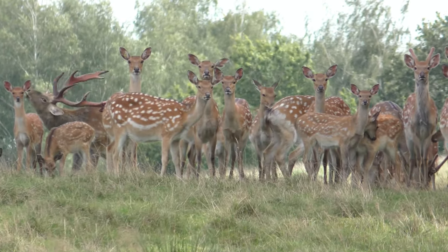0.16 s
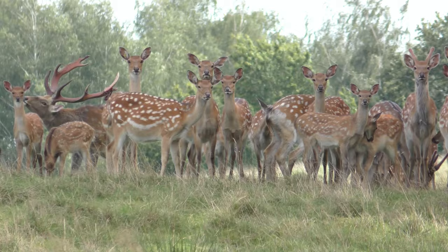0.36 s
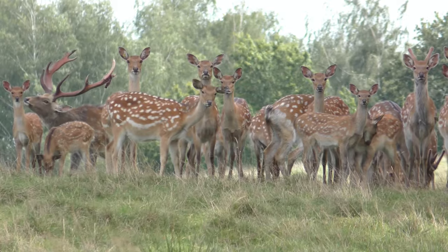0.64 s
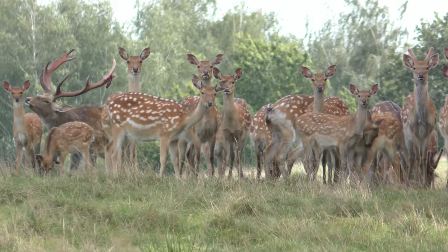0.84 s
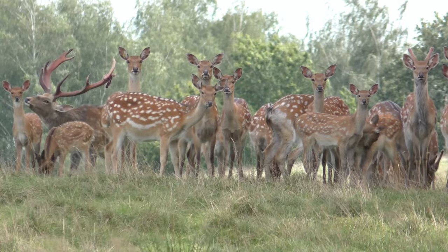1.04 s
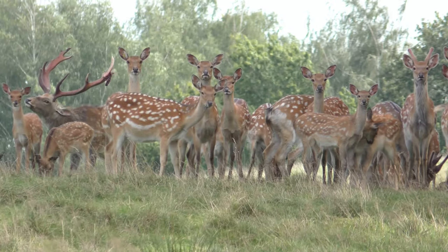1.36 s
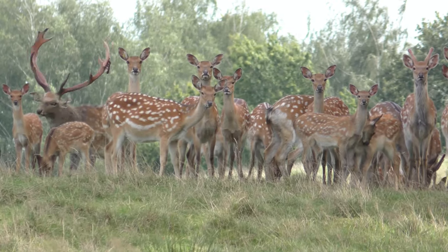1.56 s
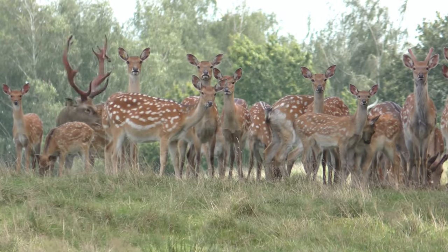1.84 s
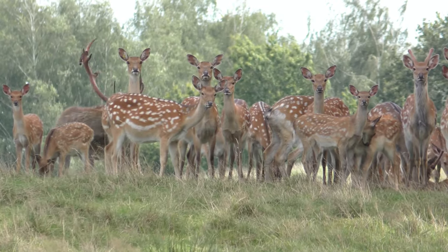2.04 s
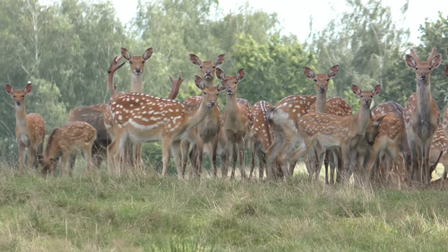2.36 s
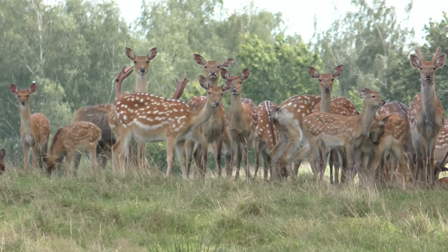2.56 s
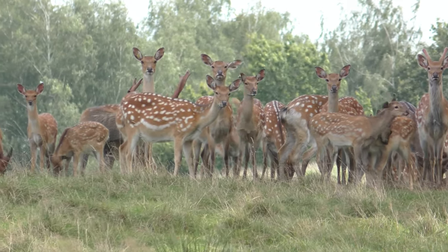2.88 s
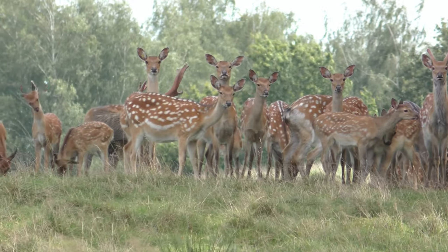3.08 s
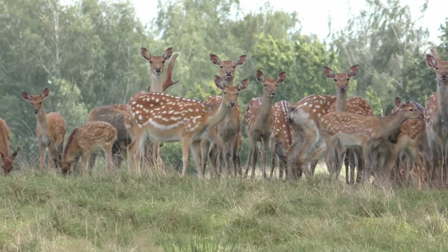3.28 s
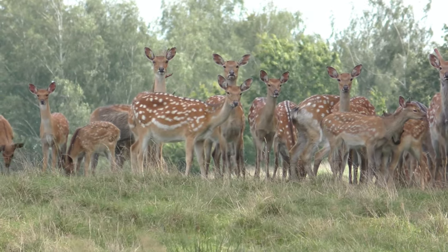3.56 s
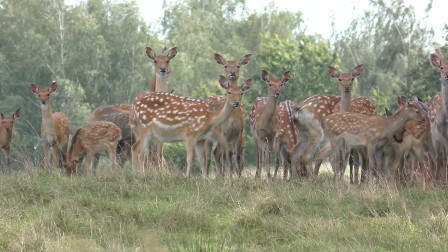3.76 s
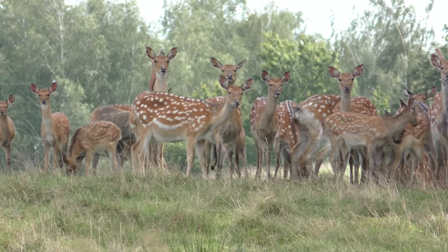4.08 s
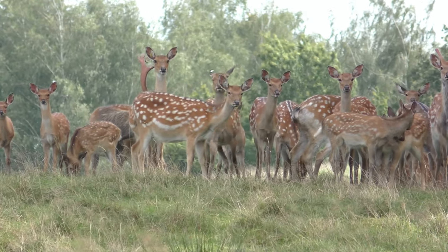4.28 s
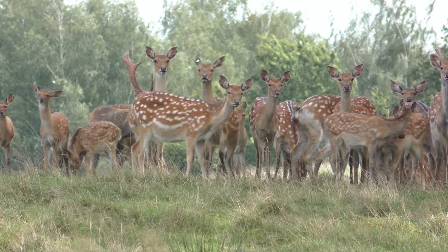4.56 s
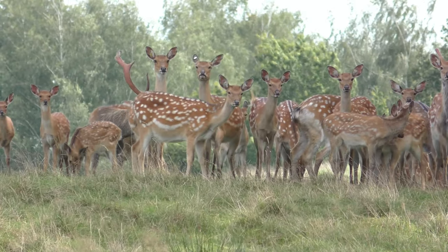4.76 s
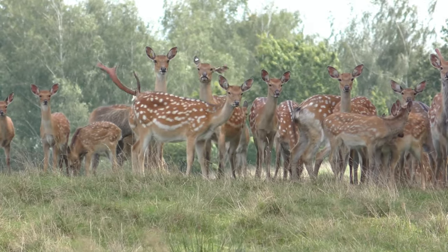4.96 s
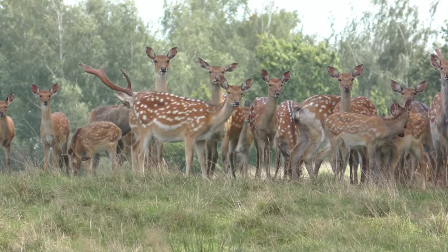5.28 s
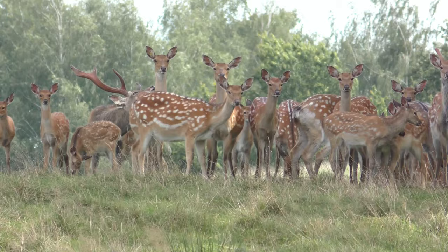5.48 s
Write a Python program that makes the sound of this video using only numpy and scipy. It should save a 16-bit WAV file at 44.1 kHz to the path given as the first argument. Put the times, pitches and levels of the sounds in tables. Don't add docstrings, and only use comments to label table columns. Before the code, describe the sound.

Deer in a meadow give short, high whistling squeaks, some ending in tiny croaks, over soft low wind rumble and faint leaf hiss.

```python
import sys
import numpy as np
from scipy import signal
from scipy.fft import rfft, irfft, next_fast_len
from scipy.io import wavfile
from scipy.ndimage import uniform_filter1d

SR = 44100
rng = np.random.default_rng(int(sys.argv[2]) if len(sys.argv) > 2 else 0)


def persist_wave(psi):
    counts = np.round(np.clip(psi, -1, 1) * 32767).astype(np.int16)
    wavfile.write(sys.argv[1], SR, np.atleast_2d(counts).T)


def makeup_ratio(level_db):
    decades = np.asarray(level_db, float) / 20
    return 10 ** decades


N = 248283


def unit_rms(x):
    return x / np.sqrt(np.mean(x ** 2) + 1e-20)


def in_time(rows):
    s, *columns = np.transpose(rows)
    at = np.arange(round(s[0] * SR), min(round(s[-1] * SR), N))
    return at, [np.interp(at / SR, s, c) for c in columns]


def at_hz(points, hz):
    table_hz, table_db = np.transpose(points)
    return np.interp(np.log(hz + 1), np.log(table_hz), table_db)


def drift(rate_hz, size):
    r = np.exp(-2 * np.pi * rate_hz / SR)
    wander = signal.lfilter([1], [1, -2 * r, r * r], rng.standard_normal(size + 20000))
    return unit_rms(wander[20000:])


# (frequency [Hz], left-right correlation [-1..1])
LIKENESS = [(60, -0.35), (130, 0.17), (290, -0.13), (640, 0.68), (1410, 0.09), (3100, 0.033), (6820, 0.17),
            (15000, -0.49)]


def coloured(points, alike=None):
    size = next_fast_len(N)
    hz = np.arange(size // 2 + 1) * SR / size
    c = np.clip(at_hz(LIKENESS, hz) if alike is None else alike, -.95, .95)
    mid, side = rfft(rng.standard_normal((2, size))) * makeup_ratio(at_hz(points, hz))
    spectrum = np.sqrt(1 + c) * mid + np.sqrt(1 - c) * side * [[1], [-1]]
    pair = irfft(spectrum, size)[:, :N]
    return pair / np.std(pair.mean(axis=0))


def panned(x, pan_db):
    return x * makeup_ratio(np.reshape([pan_db / 2, -pan_db / 2], (2, -1)))


def over_call(row, share):
    return np.interp(share, np.linspace(0, 1, len(row)), row)


def rounded(rows):
    a = np.array(rows, float)
    half, step = (a[1:] + a[:-1]) / 2, np.diff(a[:, 0])
    half[:, 2] = 20 * np.log10((makeup_ratio(a[1:, 2]) + makeup_ratio(a[:-1, 2])) / 2)
    slope = np.diff(a[:, 1]) / step
    both = slope[1:] * slope[:-1]
    inner = np.where(both > 0, 2 * both / (slope[1:] + slope[:-1] + 1e-9), 0)
    bend = np.r_[slope[0], inner, slope[-1]]
    half[:, 1] -= step * np.diff(bend) / 8
    return sorted(map(tuple, np.vstack([a, half])))


# (time [s], pitch [Hz], level [dB])
LEAD_IN = [(.519, 4200, -68), (.53, 4290, -58.5), (.551, 4560, -62)]
HIGH_ARCH = [(.558, 4717, -22.5), (0.566, 4985, -20), (.585, 4927, -17.5), (.608, 5047, -16.5),
             (0.649, 5003, -15.5), (0.689, 4910, -16.5), (0.727, 4774, -18.5), (0.741, 4450, -28),
             (0.779, 4106, -26)]
LOW_ARCH = [(1.247, 2833, -68), (1.261, 2595, -25), (1.287, 2738, -28.5), (1.316, 2719, -29.5),
            (1.389, 2566, -21.5), (1.42, 2195, -26.5), (1.448, 1940, -22.5), (1.457, 1180, -39)]
ANSWER = [(1.36, 3640, -64.5), (1.369, 3410, -26.5), (1.389, 3512, -20), (1.423, 3524, -19),
          (1.472, 3435, -20.5), (1.506, 3367, -35.5), (1.557, 3187, -20.5), (1.584, 2976, -24),
          (1.621, 2520, -23)]
YELP = [(2.494, 3620, -59), (2.503, 3436, -21), (2.51, 3396, -14), (2.52, 3397, -23.5), (2.536, 3010, -37),
        (2.55, 2814, -18.5), (2.576, 2610, -36.5), (2.582, 2323, -53), (2.597, 1750, -53.5)]
LEVEL_CALL = [(3.121, 3210, -38.5), (3.139, 2900, -30), (3.169, 2830, -24.5), (3.229, 2815, -24),
              (3.23, 2680, -22), (3.27, 2783, -24), (3.357, 2610, -22), (3.388, 2255, -20),
              (3.406, 2388, -22)]
WHINE = [(4.297, 4750, -50.5), (4.314, 4600, -49), (4.338, 4505, -32.5), (4.387, 4330, -35),
         (4.394, 4040, -38), (4.49, 3710, -34.5), (4.506, 3490, -36.5), (4.529, 3550, -57),
         (4.547, 3264, -38.5)]
SOFT_ARCH = [(4.424, 2750, -53.5), (4.443, 2545, -31), (4.477, 2628, -38), (4.555, 2580, -32),
             (4.584, 2510, -31), (4.625, 2321, -27.5), (4.652, 2074, -31.5), (4.665, 1800, -26.5),
             (4.683, 1657, -47)]
LONG_FALL = [(4.683, 3012, -49.5), (4.729, 3050, -36.5), (4.762, 3099, -38), (4.888, 2826, -36.5),
             (4.905, 2696, -35), (4.98, 2588, -37.5), (5.029, 2470, -44.5), (5.092, 2170, -52),
             (5.102, 2020, -34)]
CALLS = [LEAD_IN + HIGH_ARCH, LOW_ARCH, ANSWER, YELP, LEVEL_CALL, WHINE, SOFT_ARCH, LONG_FALL]
# (length [s], end pitch [ratio to last], loss [dB], loss by half way [0-1])
BREAKS = [(0.016, 0.8, 19, .7), (0.003, 1, 0.5, 0.35), (0.01, 1, 23, 0.46), (.003, 0.41, 11, .6),
          (0.011, 0.79, 21, 0.084), (0.033, 1, 25, 0.21), (0.0056, 0.9, -5, .6), (0.028, 0.95, 15, 0.1)]
# (breath re effort [dB], flutter [dB])
VOICES = [(-39, 1.0), (-54.5, 0.5), (-34, 0.95), (-57, 2.5), (-48.5, 0.16), (-44, 2), (-38, 1.0),
          (-39, 1.5)]


def contour(call):
    rows = CALLS[call]
    last_s, last_hz, last_db = rows[-1]
    slide_s, end, loss_db, early = BREAKS[call]
    slide = [(last_s + slide_s / 2, end ** 0.79 * last_hz, last_db - early * loss_db),
             (last_s + slide_s, end * last_hz, last_db - loss_db)]
    at, (hz, db) = in_time(rounded(rows) + slide)
    flutter_db = VOICES[call][1]
    hz = uniform_filter1d(hz, size=120) * (1 + 0.002 * flutter_db * drift(70, len(at)))
    return at, hz, uniform_filter1d(db, size=140)


# (4th overtone re 3rd [dB], 5th re 3rd [dB], half-pitch lines re effort [dB])
OVERTONES = [(-33, -30, -32), (-26.5, -25.5, -22), (1.5, -5.5, -35), (-8, -14.5, -54), (-1, -15.5, -39.5),
             (-11, -20, -28.5), (-16.5, -19, -14.5), (-10, -21, -28.5)]
TENSION = [(-10, -6, -8, -6, -4, -19.5), (-17, -13, -16.5, -20, -45, -61), (-9, -21.5, -31, -27, -5.5, -10),
           (-35, -28, -20.5, -20, -4.5, -12), (-17, -13.5, -14, -13, -19, -25),
           (-22, -21, -22, -25, -25, -24), (-9, -18, -22, -24, -17.5, -27), (-18, -17, -21, -19, -21, -27)]
# (growth of 4th and 5th overtones [dB], fade of breath [dB])
STRAIN = [(0, 12), (0.5, 2), (-2, -4.5), (0, 5.5), (9.5, -2), (0, 1), (15, 7), (0, -3)]
OVERTONE_EDGE_S, OVERTONE_WAVER_DB = 0.013, 1.9
MUZZLE_HZ, MUZZLE_WIDTH_HZ, MUZZLE_DB = 7930, 540, 11


def overtones(call, share, hz, phase, second, beating):
    _, (fourth_db, fifth_db, _) = call, OVERTONES[call]
    third_db = over_call(TENSION[call], share)
    grown_db = STRAIN[call][0] * (share - .5)
    edge = np.minimum(1, np.minimum(share, 1 - share) * len(hz) / SR / OVERTONE_EDGE_S)
    partials = [(2, 0), (3, third_db), (4, third_db + fourth_db + grown_db),
                (5, third_db + fifth_db + 2 * grown_db)]
    upper = np.zeros(len(hz))
    for k, partial_db in partials:
        muzzle_db = MUZZLE_DB / (1 + ((k * hz - MUZZLE_HZ) / MUZZLE_WIDTH_HZ) ** 2)
        waver_db = OVERTONE_WAVER_DB * (k - 1) ** .5 * drift(25, len(hz))
        level = second * makeup_ratio(partial_db + muzzle_db + waver_db) * edge ** (k - 1)
        audible = k * hz < .45 * SR
        upper += level * np.imag(beating * np.exp(1j * k * phase)) * audible
    return upper


# (send to trees [dB], half-pitch raggedness [rad], beaming of top pitch [exponent])
FACING = [(4, 1, 3.3), (1.5, .2, 2.2), (10, 0.22, 9.7), (4.5, 0.59, 1.9), (-4.5, 0.47, 0.97), (8, 0.32, .3),
          (5, 0.11, 2.8), (-0.5, 0.88, 1.1)]
# (overtones left-right [dB], half-pitch need of top pitch [exponent])
MOUTH = [(-4, 5), (5, 19), (-4.5, 3), (-3, 8.97), (-5.5, 7.2), (-6, 8.2), (6, 12), (-1, 18)]


def half_pitch(call, hz, phase, effort):
    half_db, ragged, tight = OVERTONES[call][2], FACING[call][1], MOUTH[call][1]
    held = effort * (hz / hz.max()) ** tight
    tone = np.zeros(len(hz))
    for k, partial_db in [(.5, -4), (1.5, -6.0), (2.5, -19)]:
        level = makeup_ratio(half_db + partial_db + 5.3 * ragged * drift(30.14, len(hz)))
        tone += held * level * np.sin(k * (phase + ragged * drift(210, len(hz))))
    return tone


HEAD = [(1, 3, 7.5, 4.5, 0, -1), (4.5, 1.5, 2.5, 1.5, 1.4, 1), (-3.5, -5, 2, -4.5, 2, 1.5),
        (3, 2.5, -1.5, -2.5, 0.057, 1), (3, 3.5, 1.5, 0, 0, 0), (5, 2.5, 6.5, 3, 2, 0),
        (0, 2, 1.5, -0.5, 1, 1), (2, 2.5, 1.5, 3.5, 2.4, 1.2)]
OPENING = [(-29.5, -24, -29.5, -27, -30, -35), (-28, -20, -20, -20, -21, -28),
           (-26, -28.5, -16, -10.5, -35.5, -34.5), (-22, -20, -17, -22, -26.5, -24),
           (-18.5, -21.5, -22, -22, -19, -16), (-36, -39.5, -37, -35, -30, -22.5),
           (-26.5, -11, -12, -16.5, -14.5, -25), (-32, -40, -41, -42, -46, -22)]
HEAD_SHAKE_DB = 1.4
OVERTONE_LIFT_DB = 12


def whistles(breath, beat):
    out, sent = np.zeros((2, N)), np.zeros(N)
    for call in range(len(CALLS)):
        at, hz, db = contour(call)
        breath_db, flutter_db = VOICES[call]
        send_db, _, beam = FACING[call]
        share = (at - at[0]) / len(at)
        phase = 2 * np.pi * np.cumsum(hz) / SR
        beating = 1 + beat[at]
        fade = np.minimum(1, np.minimum(at - at[0], at[-1] - at) / 60)

        slow = uniform_filter1d(makeup_ratio(db), size=2400)
        effort = slow * np.minimum(1, (at - at[0]) / 500)
        second = makeup_ratio(over_call(OPENING[call], share)) * np.minimum(slow, makeup_ratio(db + OVERTONE_LIFT_DB))
        tone = makeup_ratio(db + flutter_db * drift(83, len(at))) * np.imag(beating * np.exp(1j * phase))
        tone += half_pitch(call, hz, phase, effort)
        upper = overtones(call, share, hz, phase, second, beating)
        spent_db = STRAIN[call][1] * (share - .5)
        air = makeup_ratio(breath_db - spent_db + 2.5 * drift(40, len(at))) * effort * breath[at]

        pan_db = over_call(HEAD[call], share) + HEAD_SHAKE_DB * drift(15, len(at))
        tone /= panned(0.97, pan_db).mean(axis=0)
        out[:, at] += panned(fade * np.sqrt(2) * tone, pan_db)
        out[:, at] += panned(np.sqrt(2) * upper, MOUTH[call][0])
        out[:, at] += panned(fade * air, 0.56)

        even = uniform_filter1d(makeup_ratio(db), size=900, mode="constant")
        thrown = 1.45 * even * np.sin(phase) + second * makeup_ratio(1) * np.sin(2 * phase)
        sent[at] += fade * makeup_ratio(send_db) * (hz / hz.max()) ** beam * thrown
    return out, sent


# (time [s], frequency [Hz], level [dB])
UNDERTONE = [(.556, 804, -67.5), (.574, 723, -42.5), (.592, 778, -39), (.613, 690, -38), (.621, 776, -51.5),
             (.642, 875, -48.5), (.67, 1028, -61.5), (.722, 985, -50), (.768, 444, -63)]
# (multiple [1], level [dB])
UNDERTONE_ORDERS = [(1, -21.5), (2, 3.5), (3, -20), (4, -3.5)]
# (time [s], frequency [Hz], depth [dB])
BEAT = [(.556, 500, -17), (.58, 730, -18), (.595, 807, -27), (.61, 940, -22), (.635, 885, -21.5),
        (.653, 880, -25), (.662, 880, -42.5), (.768, 880, -50)]
BEAT_UPPER_DB, BEAT_HISS_DB = -7, -10


def undertone():
    at, (hz, db) = in_time(UNDERTONE)
    phase = 2 * np.pi * np.cumsum(hz * (1 + 0.027 * drift(200, len(at)))) / SR
    sound, beat = np.zeros(N), np.zeros(N, complex)
    for k, order_db in UNDERTONE_ORDERS:
        sound[at] += makeup_ratio(db + order_db + 3.5 * drift(64, len(at))) * np.sin(k * phase)
    at, (hz, depth_db) = in_time(BEAT)
    turn = np.exp(1j * (2 * np.pi * np.cumsum(hz) / SR + .9 * drift(200, len(at))))
    lines = 1 / turn + makeup_ratio(BEAT_UPPER_DB) * turn
    beat[at] = makeup_ratio(depth_db + 3.5 * drift(150, len(at))) * lines
    hiss_level = makeup_ratio(depth_db + BEAT_HISS_DB + 2.5 * drift(70, len(at)))
    beat[at] += hiss_level * drift(2500, len(at))
    return panned(sound, -1.7), beat


# (time [s], pulse rate [1/s], level [dB], brightness [dB], fade [dB/s])
CROAKS = [
    (.795, 408, -28, -19.5, 887.5),
    (0.819, 476, -39.5, -15.5, 501),
    (.848, 400, -50.5, -19.5, 400),
    (1.453, 740, -44.5, 6, 799.5),
    (1.635, 300, -53, -3, 645.5),
    (2.599, 450, -41, -26, 394),
    (3.411, 477, -20.5, 12, 1701),
    (3.418, 420, -32, -8, 1100),
    (4.675, 260, -54, 12, 334),
]
# (time [s], pulse rate [1/s], level [dB], roughness [0-1])
RASP = [(5.113, 443, -53, 0.54), (5.119, 530, -42, 0.64), (5.15, 486, -29, 0.45), (5.174, 474, -38, .5),
        (5.225, 348, -37.5, 0.46), (5.272, 322, -45.5, 0.47), (5.303, 320, -51.5, 0.3),
        (5.348, 276, -52.5, 0.28), (5.385, 204, -68, 0.34)]
RASP_BRIGHT_DB, RASP_DULLS_DB_PER_S = 17, 49
CROAK_RISE_S, CROAK_HOLD_S, CROAK_SAG_PER_S, CROAK_ROUGH, CROAK_RANGE_DB = 0.0034, 0.0053, 4.3, 0.53, 38


def croak_shapes():
    shapes = []
    for s, rate_hz, db, bright_db, fade in CROAKS:
        length_s = CROAK_RANGE_DB / fade
        peak_s = s + CROAK_RISE_S
        held_s = peak_s + CROAK_HOLD_S
        end_hz = rate_hz * np.exp(-CROAK_SAG_PER_S * length_s)
        shapes.append([(s, rate_hz, db - 5.0, bright_db, CROAK_ROUGH),
                       (peak_s, rate_hz, db, bright_db, CROAK_ROUGH),
                       (held_s, rate_hz, db - 4.5, bright_db, CROAK_ROUGH),
                       (held_s + length_s, end_hz, db - CROAK_RANGE_DB, bright_db, CROAK_ROUGH)])
    start = RASP[0][0]
    rasp = [(s, hz, db, RASP_BRIGHT_DB - RASP_DULLS_DB_PER_S * (s - start), rough)
            for s, hz, db, rough in RASP]
    return shapes + [rasp]


def resonate(x, modes, scale, widen, sag):
    out = np.zeros(len(x))
    for k, (hz, width_hz, db) in enumerate(modes):
        r, state = np.exp(-np.pi * widen * width_hz / SR), np.zeros(2)
        b = (-1) ** k * makeup_ratio(db) * (1 - r * r) / 2 * np.array([1, 0, -1])
        for i in range(0, len(x), 256):
            turn = 2 * np.pi * scale * hz * np.exp(-sag * i / SR) / SR
            a = [1, -2 * r * np.cos(turn), r * r]
            part, state = signal.lfilter(b, a, x[i:i + 256], zi=state)
            out[i:i + 256] += part
    return out


# (frequency [Hz], width [Hz], level [dB])
THROAT_LOW = [(317, 101, -9), (500, 230, -8.5), (859, 89, 7.5)]
THROAT_HIGH = [(1170, 59, -0.5), (1452, 63, 2)]
THROAT_TOP = [(2070, 70, -13), (2680, 140, -14), (3090, 95, -19), (3234, 250, -24), (4730, 430, -20.5)]
# (resonance pitch [ratio], top pitch [ratio], width [ratio], top [dB], cut [Hz])
THROATS = [(1.08, 1.3, 0.5, -11, 3800), (0.9, 1.2, 0.92, -3, 4700), (0.98, .86, .8, -3, 3500),
           (1.1, 1.01, 1, 6, 6200), (1.1, 1.01, 1.1, -1.5, 3600), (0.782, 0.82, 0.57, -15, 2300),
           (0.963, 0.94, 2.75, -0.5, 4700), (0.85, 1.1, 2.0, -6, 4000), (0.88, 1.1, 1.2, 10, 4700),
           (1.022, 1, 1.62, 11.5, 3100)]
THROAT_SAG_PER_S = 0.33
STRONG_WEAK = 0.68


def croaks():
    out = np.zeros(N)
    for rows, (scale, top_scale, widen, top_db, cut_hz) in zip(croak_shapes(), THROATS):
        at, (rate_hz, db, bright_db, rough) = in_time(rows)
        cycle = np.cumsum(rate_hz * (1 + .1 * rough * drift(150, len(at)))) / SR
        pulse = np.diff(np.floor(cycle), prepend=0) * makeup_ratio(4 * rough * rng.standard_normal(len(at)))
        pulse *= 1 + STRONG_WEAK * rough * (-1) ** np.floor(cycle)
        gated = .2 * rough ** 2 * rng.standard_normal(len(at)) * np.exp(-2 * (cycle % 1))
        soften = signal.butter(9, cut_hz, fs=SR, output="sos")
        source = signal.sosfilt(soften, pulse + gated)
        sound = resonate(source, THROAT_LOW, scale, widen, THROAT_SAG_PER_S)
        sound -= makeup_ratio(bright_db) * resonate(source, THROAT_HIGH, scale, widen, THROAT_SAG_PER_S)
        sound -= makeup_ratio(top_db) * resonate(source, THROAT_TOP, top_scale, widen, 0)
        even = np.sqrt(uniform_filter1d(sound ** 2, size=500) + 1e-9)
        fade = np.minimum(1, np.minimum((at[-1] - at) / 200, (at - at[0]) / 70))
        out[at] += makeup_ratio(db) * sound / even * fade
    return panned(out, 1.7)


# (time [s], level [dB], length [s], top hiss [dB])
PUFFS = [(0.547, -45.5, 0.11, -59), (1.233, -44, 0.012, -73), (1.361, -50, 0.011, -69),
         (1.365, -67, 0.047, -64), (2.483, -61.5, 0.01, -76), (3.11, -43.5, 0.014, -71),
         (4.294, -61.5, 0.0056, -78), (4.412, -53, 0.024, -69), (0.855, -66, 0.0042, -77),
         (0.79, -55.5, 0.075, -66), (2.583, -43.5, 0.0093, -60.5), (3.375, -56, 0.04, -60),
         (4.61, -73.5, 0.032, -71.5), (4.67, -55, 0.043, -69.5), (5.094, -57, 0.013, -79),
         (1.59, -71, 0.028, -67.5)]


def puffs(breath, hiss):
    out, t = np.zeros(N), np.arange(N) / SR
    for s, db, length_s, top_db in PUFFS:
        age = np.clip((t - s) / length_s, 0, 8)
        shape = np.minimum(age * 11.0, 1) * np.exp(-age ** 2) * (t > s)
        out += shape * (makeup_ratio(db) * breath + makeup_ratio(top_db) * hiss)
    return panned(out, 1.5)


# (delay of nearest trunks [s], level [dB], fade [dB/s])
TREES = [
    (0.135, -35, 26),
    (0.19, -30, 300),
    (.37, -43, 45),
]
# (delay [s], level [dB], left-right [dB])
ECHOES = [
    (.115, -42, 2),
    (.174, -33, -3),
    (.19, -38, 1),
    (.3, -44, 1.5),
    (.345, -40.5, -6),
    (.365, -46.5, 0),
]
# (frequency [Hz], level [dB])
TREES_COLOUR = [(300, -10.5), (1000, -9), (2600, 3), (3100, 1.5), (3450, -5), (5000, -13), (7000, -15.5),
                (12000, -24.5)]
TREES_RISE_DB_PER_S, TREES_FIRST_S, TREES_LAST_S, TRUNKS_PER_S = 332.5, 0.025, .9, 1200


def trees(x):
    at = np.arange(round(TREES_FIRST_S * SR), round(TREES_LAST_S * SR))
    delay_s = at / SR
    row_db = [top_db - np.maximum(TREES_RISE_DB_PER_S * (s - delay_s), fade * (delay_s - s))
              for s, top_db, fade in TREES]
    db = np.max(row_db, axis=0)
    trunks = (rng.random(len(at)) < TRUNKS_PER_S / SR) * rng.standard_normal(len(at))
    size = next_fast_len(N + SR)
    scatter = np.zeros((2, size))
    scatter[:, at] = panned(makeup_ratio(db - 21) * trunks, 11.0 * rng.standard_normal(len(at)))
    scatter[:, at] += makeup_ratio(db - 35.5) * rng.standard_normal((2, len(at)))
    for s, echo_db, side_db in ECHOES:
        scatter[:, round(s * SR)] += panned(makeup_ratio(echo_db), side_db)[:, 0]
    colour = makeup_ratio(at_hz(TREES_COLOUR, np.arange(size // 2 + 1) * SR / size))
    sway = 1 + 0.081 * drift(30, N)
    return sway * irfft(rfft(x, size) * rfft(scatter) * colour, size)[:, :N]


# (frequency [Hz], density [dB/Hz])
AIR = [(180, -23), (300, -12), (326, -13.5), (411, -5.5), (1570, -10), (1980, -11.5), (3090, -13),
       (15700, -26)]
AIR_DB = -64
# (frequency [Hz], density [dB/Hz])
GRASS = [(180, -43), (300, -9.5), (553, -6.5), (642, -2.5), (1170, -3), (1270, -2.5), (7310, -5.5),
         (15700, -8)]
# (time [s], level [dB], hold [s])
GUST = [
    (2.327, -58.5, 0.19),
    (2.669, -74.5, 0.089),
    (2.903, -73, 0.0085),
    (3.495, -73, 0.025),
    (3.666, -73.5, 0.006),
    (3.797, -72, 0.077),
    (4.195, -80.5, 0.071),
    (5.214, -70.5, .012),
    (5.3, -78.5, 0.25),
]
GUST_RISE_DB_PER_S, GUST_FALL_DB_PER_S = 144, 129


def meadow():
    t = np.arange(N) / SR
    gust_power = np.zeros(N)
    for s, db, hold_s in GUST:
        rise_db = GUST_RISE_DB_PER_S * np.maximum(s - t, 0)
        fall_db = GUST_FALL_DB_PER_S * np.maximum(t - s - hold_s, 0)
        gust_power += makeup_ratio(2 * (db + 7.5 - rise_db - fall_db))
    air = makeup_ratio(AIR_DB + 0.39 * drift(8.6, N)) * coloured(AIR)
    return air + np.sqrt(gust_power) * coloured(GRASS)


# (time [s], level [dB], left-right [dB])
WIND = [(0, -38.5, -12.5), (.3, -41.5, -4.5), (.6, -33.5, -2.5), (1.0, -34, -3), (1.4, -32.5, -5),
        (1.75, -34, -0.5), (2.1, -32.5, -5), (2.4, -41, -11.5), (2.7, -44, -6.5), (3.1, -43.5, -13),
        (3.4, -45, -6.5), (3.75, -41, -8.5), (4.2, -41.5, -2.5), (4.6, -38, -8), (5.05, -41, -13),
        (5.35, -44, -7.5), (5.63, -42.5, -6)]
# (frequency [Hz], density [dB/Hz])
RUMBLE = [(2.9, -22), (5.0, 7), (21, 0.5), (70, -23), (91, -48.5), (150, -120)]
RUMBLE_ALIKE = -.45
# (frequency [Hz], density [dB/Hz])
DRONE = [(35, -32.5), (60, 1.5), (70, -4), (113, -1), (151, -11), (178, -10.5), (400, -28), (880, -120)]
DRONE_DB = -55.5
# (time [s], peak [dB], left-right [dB], frequency [Hz])
BUFFETS = [
    (1.138, -32, -10, 24),
    (1.778, -42.5, -26, 29.3),
    (1.976, -23, -7.5, 27.8),
    (1.992, -32, -15, 31.9),
    (4.698, -49.5, -6, 243),
]


def wind():
    at, (db, pan_db) = in_time(WIND)
    lumps = makeup_ratio(0.63 * np.array([drift(3.8, N), drift(6.0, N)]))
    out = coloured(RUMBLE, RUMBLE_ALIKE) * lumps
    t = np.arange(N)
    out *= panned(np.interp(t, at, makeup_ratio(db)), np.interp(t, at, pan_db))
    out += panned(makeup_ratio(DRONE_DB + 2.6 * drift(8.9, N)) * coloured(DRONE, RUMBLE_ALIKE), -4.0)
    age = np.arange(4000) / SR
    low = signal.butter(3, 350, fs=SR, output="sos")
    for s, peak_db, side_db, hz in BUFFETS:
        push = makeup_ratio(peak_db) * np.sin(2 * np.pi * hz * age) * np.exp(-age / 0.013) * 4.9
        grit = signal.sosfilt(low, rng.standard_normal((2, len(age)))) * np.exp(-age / 0.017)
        grit *= makeup_ratio(peak_db - 9.0) / np.abs(grit).max(axis=1, keepdims=True)
        i = round(s * SR)
        out[:, i:i + len(age)] += panned(push, side_db) * [[.7], [-1]] + grit
    return out


# (frequency [Hz], density [dB/Hz])
BREATH = [(400, -28.5), (1900, -1.5), (3000, -6), (4200, 3.5), (5500, -9), (7000, -11), (9000, -24),
          (15700, -38)]
PUFF = [(400, -25.5), (900, -3.5), (1400, -7.5), (2000, 1), (4500, -16), (7000, -18), (9000, -29),
        (15700, -46)]
TOP_HISS = [(3000, -28.5), (6000, -1), (9000, 1), (12000, -4), (15700, -7)]


def scene():
    breath, puff, hiss = [coloured(points, .9).mean(axis=0) for points in (BREATH, PUFF, TOP_HISS)]
    low_voice, beat = undertone()
    direct, sent = whistles(breath, beat)
    rest = low_voice + croaks() + puffs(puff, hiss)
    return direct + rest + trees(sent + rest.mean(axis=0)) + meadow() + wind()


def band_limit(x):
    return signal.sosfilt(signal.butter(12, 15810, fs=SR, output="sos"), x)


def record(dry):
    top = signal.ellip(12, .5, 70, 15740, fs=SR, output="sos")
    mix = signal.sosfilt(top, dry)
    return band_limit(mix)


dry = scene()
out = record(dry)
persist_wave(out)
```